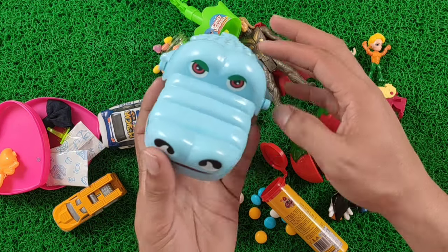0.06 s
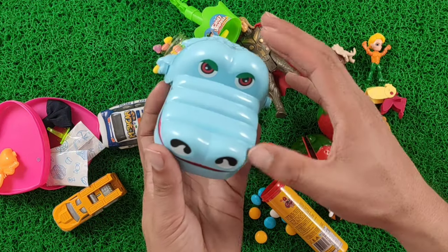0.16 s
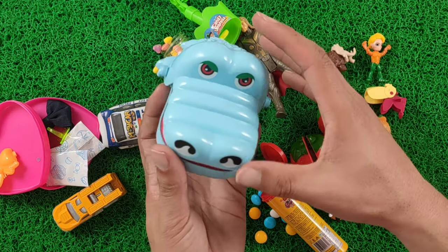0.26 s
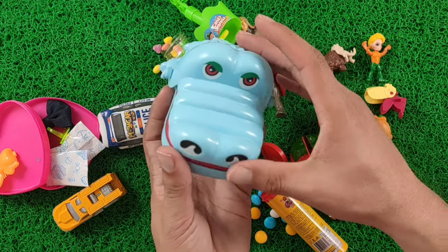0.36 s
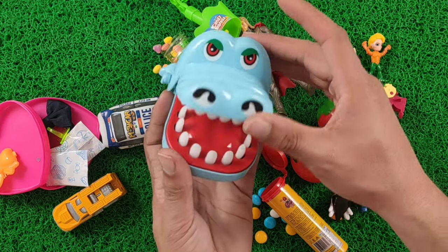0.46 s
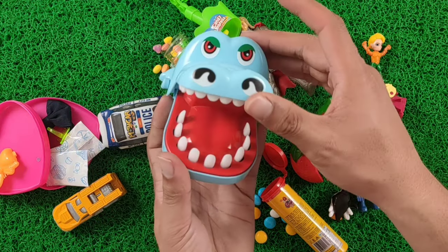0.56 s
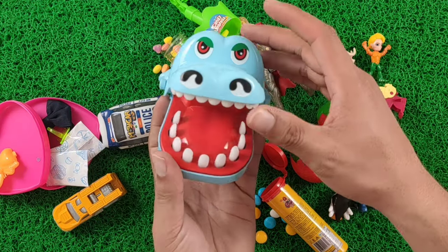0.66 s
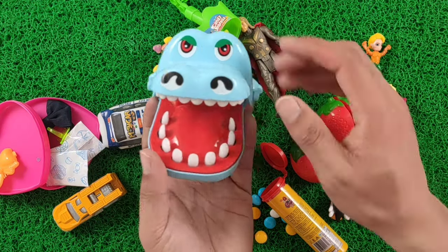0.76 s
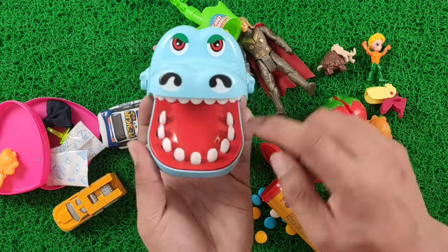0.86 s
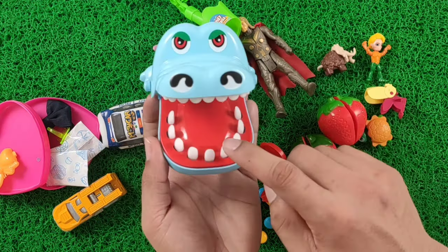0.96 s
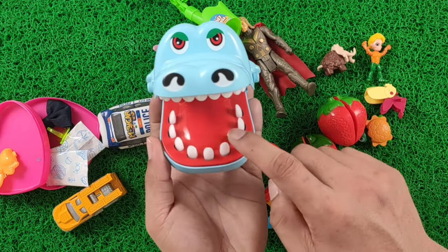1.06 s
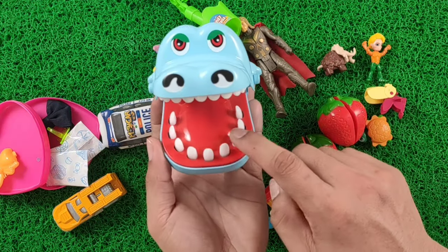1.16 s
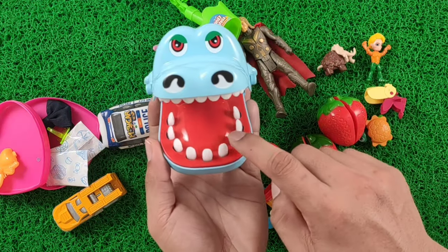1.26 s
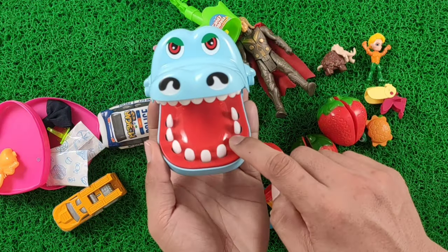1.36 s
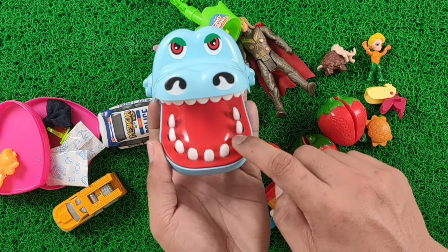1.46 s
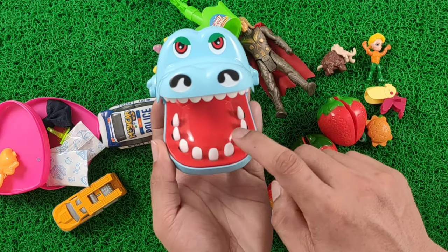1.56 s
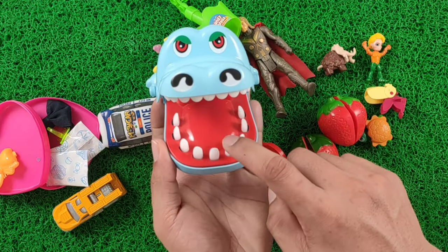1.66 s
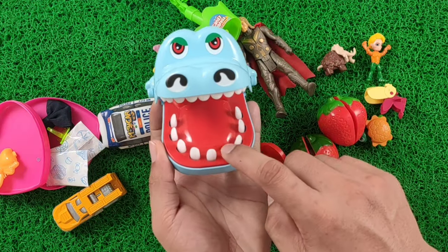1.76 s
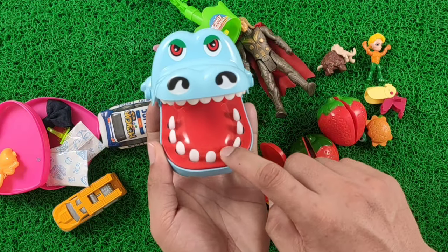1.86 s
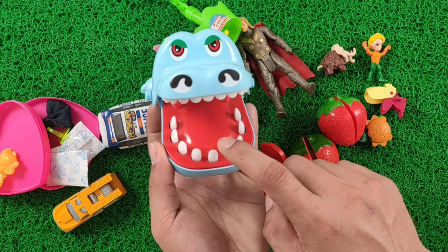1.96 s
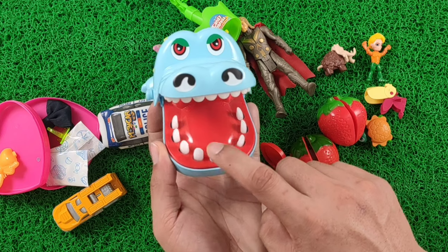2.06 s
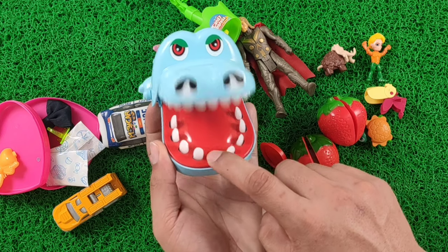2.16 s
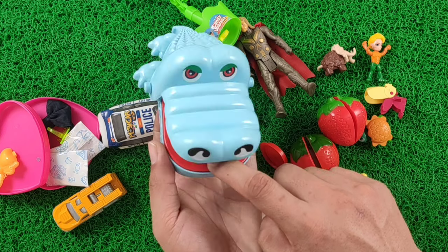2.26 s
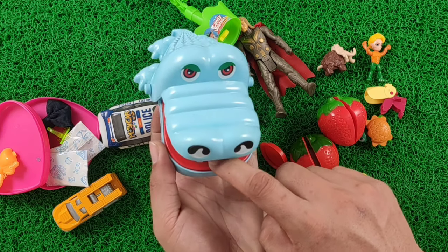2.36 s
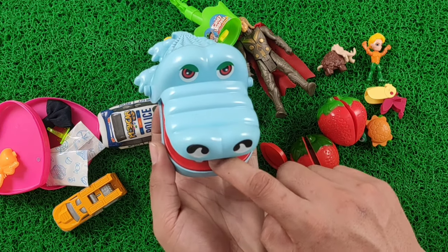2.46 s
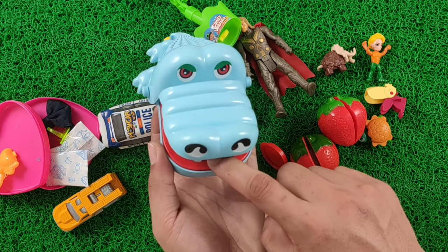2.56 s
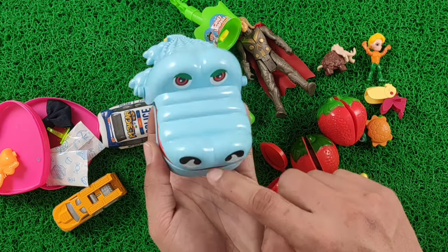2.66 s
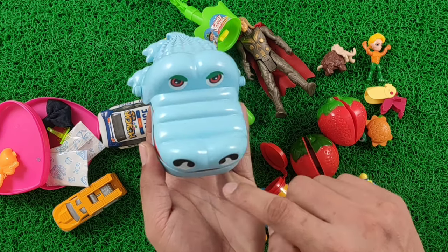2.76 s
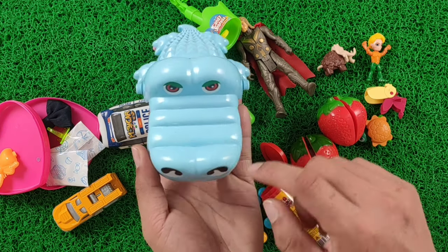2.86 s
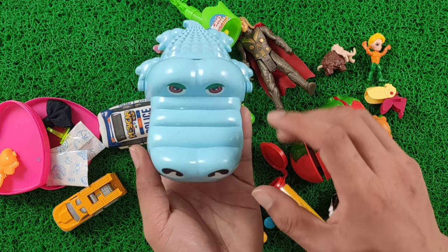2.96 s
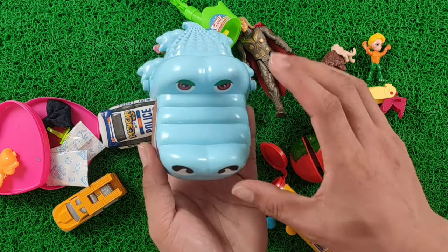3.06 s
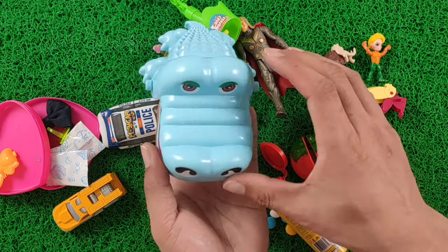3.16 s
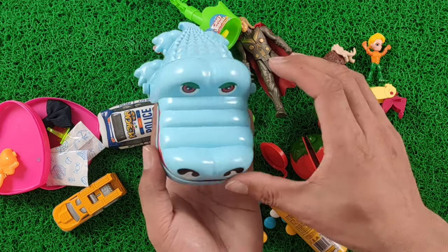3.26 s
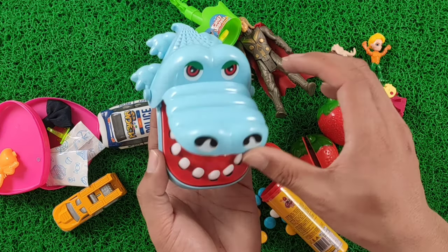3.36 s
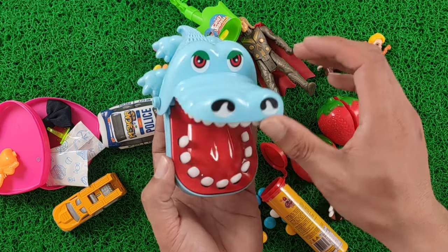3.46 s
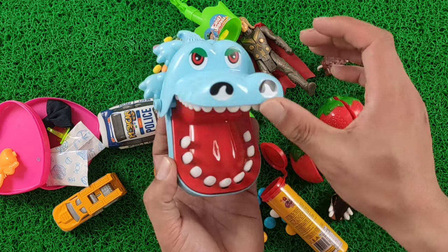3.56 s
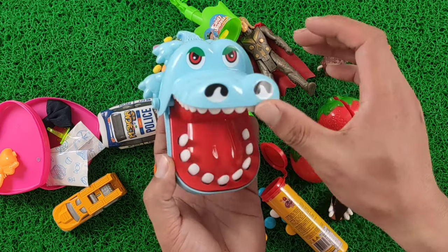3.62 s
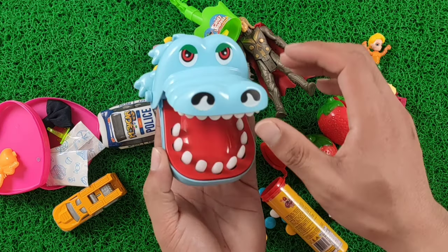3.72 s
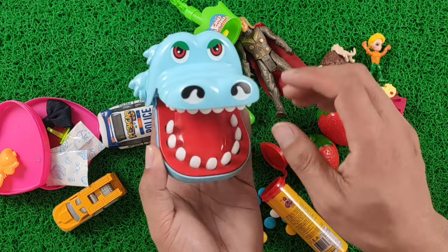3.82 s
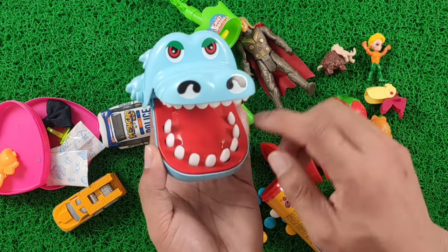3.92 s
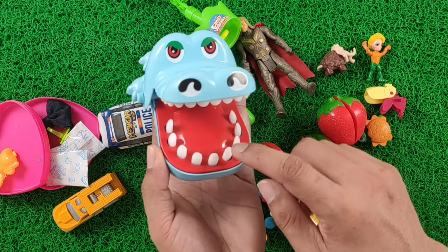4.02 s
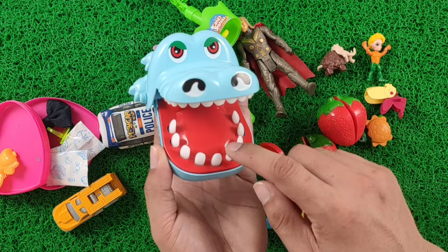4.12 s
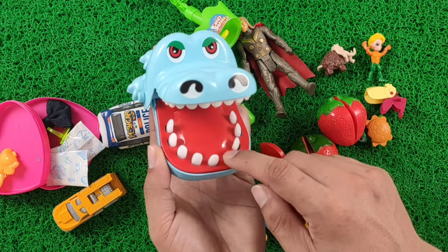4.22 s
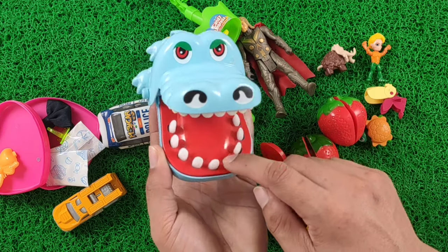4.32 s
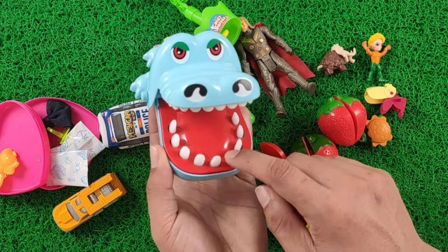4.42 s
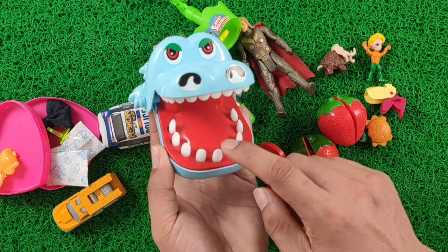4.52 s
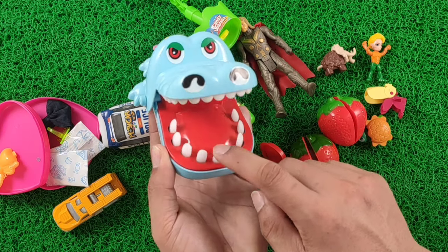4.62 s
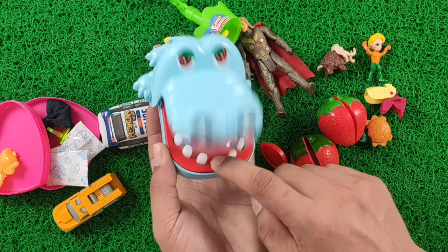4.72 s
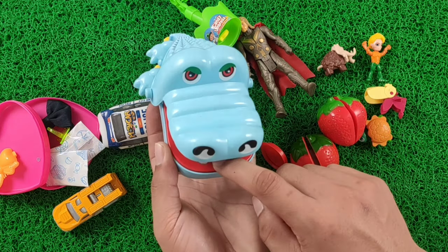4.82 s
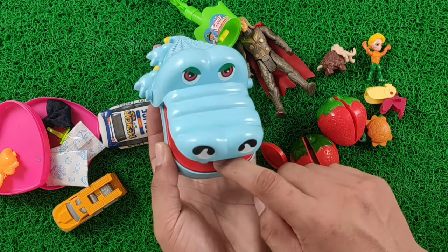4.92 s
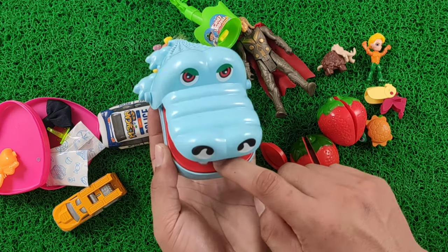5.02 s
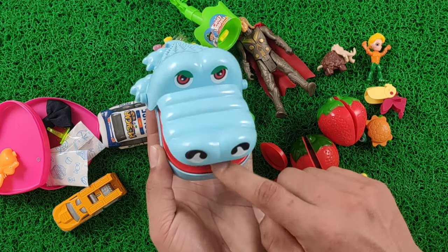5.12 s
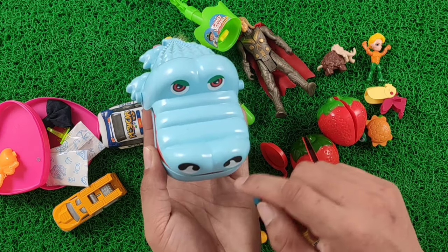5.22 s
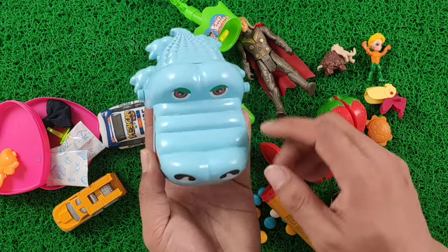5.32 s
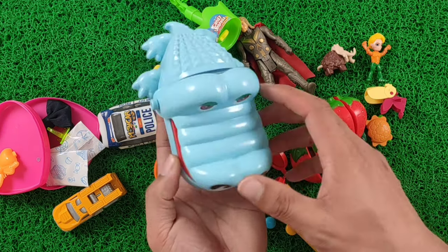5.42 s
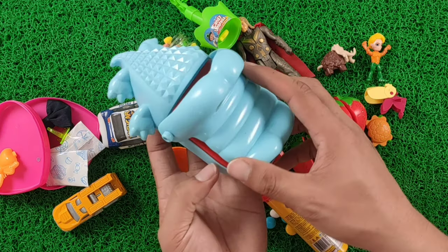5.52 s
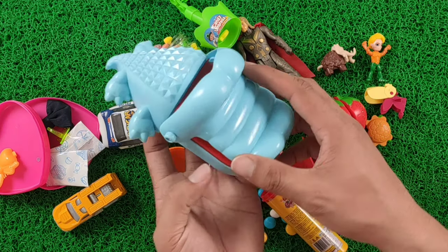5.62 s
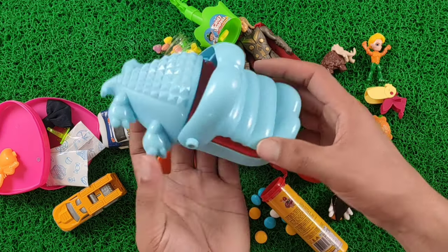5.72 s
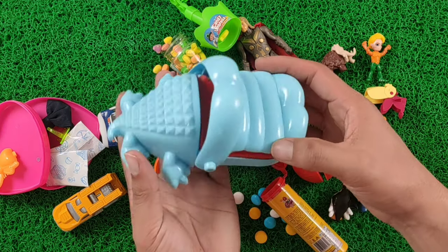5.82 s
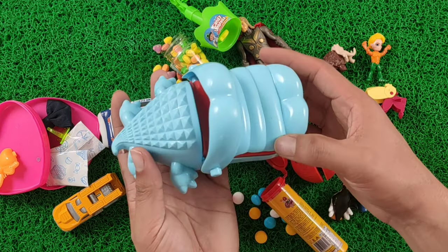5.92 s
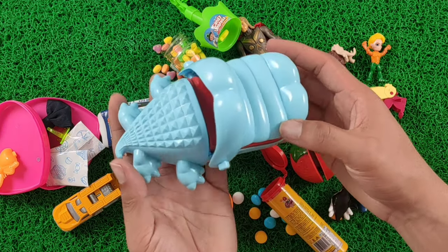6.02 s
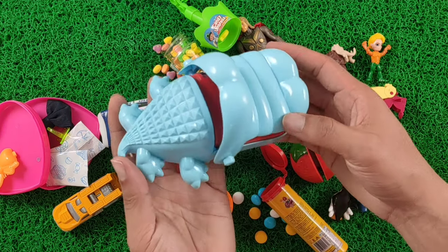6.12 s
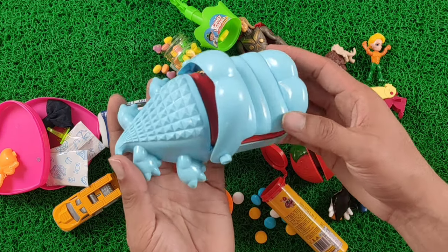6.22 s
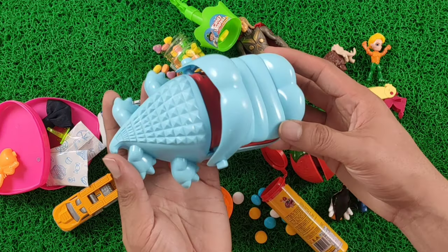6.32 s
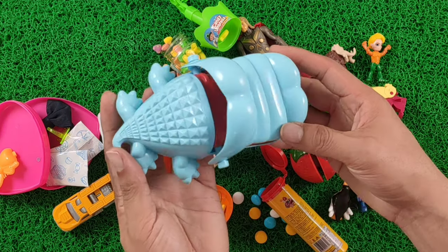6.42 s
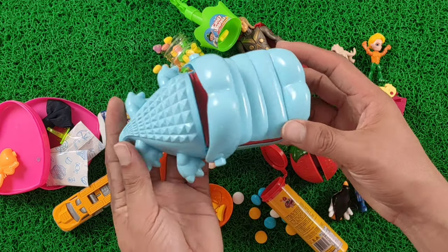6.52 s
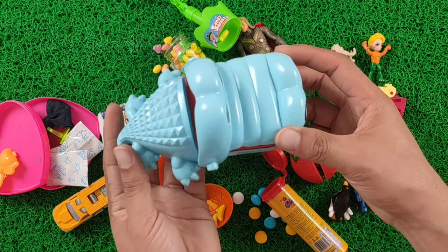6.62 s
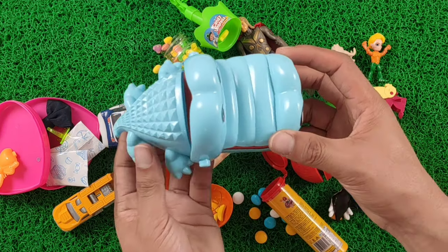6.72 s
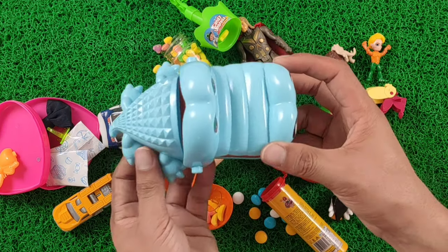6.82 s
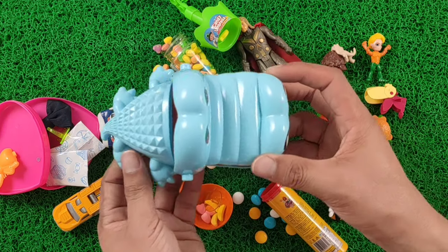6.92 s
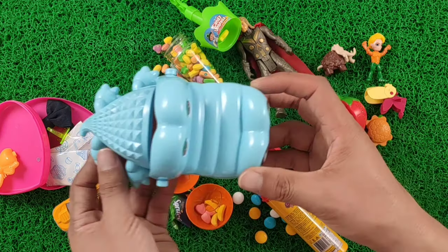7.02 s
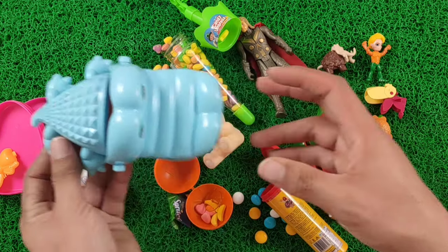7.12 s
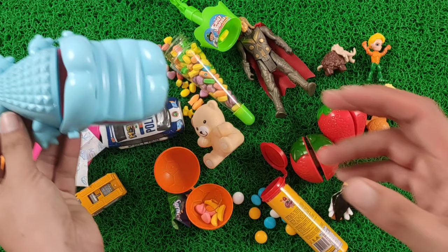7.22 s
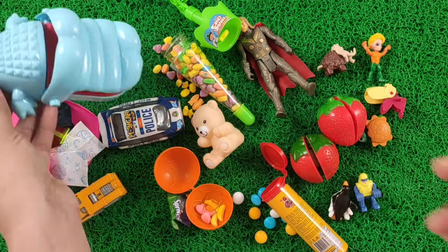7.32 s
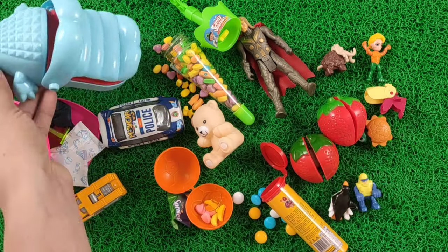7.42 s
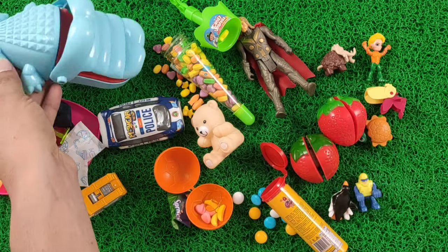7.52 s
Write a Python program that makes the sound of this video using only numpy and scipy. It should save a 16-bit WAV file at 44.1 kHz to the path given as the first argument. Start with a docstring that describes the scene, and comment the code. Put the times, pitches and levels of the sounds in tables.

```python
"""Hollow toy with a snapping jaw

A hollow plastic toy is held close to a phone in a bare room: its hinged jaw is cocked open, teeth click
down under a finger, the jaw snaps shut and is let go, twice over. Every knock rings the mouth hollow and
the shell as decaying sines and cracks in the treble as shaped noise. Grainy noise rustles as fingers rub
the plastic, creaks and dull thuds come from the grip, and a low room rumble fades out at the end.
"""
import sys
import numpy as np
from scipy import signal
from scipy.fft import rfft, irfft, next_fast_len
from scipy.io import wavfile

SR = 44100
rng = np.random.default_rng(int(sys.argv[2]) if len(sys.argv) > 2 else 0)


def to_wav(s):
    """Save 16-bit WAV."""
    ch = np.atleast_2d(s).T  # columns
    pcm = np.round(np.clip(ch, -1, 1) * 32767)  # PCM
    wavfile.write(sys.argv[1], SR, pcm.astype(np.int16))


N = 334137  # samples

EARS_APART = 1  # mix of each microphone's own noise and the noise both share: in crack it scales the own noise, in fingers the shared noise


def undb(db):
    """Decibels to linear gain."""
    return 10 ** (np.asarray(db) / 20)


def unit(x):
    """Scale to an RMS of 1."""
    return x / np.sqrt(np.mean(x ** 2))


def fall(t, t60):
    """Exponential decay that drops 60 dB in t60 seconds."""
    return np.exp(-np.log(1000) * t / t60)


def resonate(x, peaks):
    """Sum of band-passes, each given as Hz, width in Hz and dB."""
    out = 0
    for hz, width, db in peaks:
        out = out + undb(db) * signal.lfilter(*signal.iirpeak(hz, hz / width, fs=SR), x)
    return out


def toy():
    """All knocks; each kind rings freely for its own time and favours its spot of the hollow by its own amount."""
    # The mechanism moves in set runs of contacts. Each row: ms after the first contact,
    # then hollow, shell and crack level in dB, relative to the levels of the move.
    tooth_run = [(0, 0, -3, -1), (4.3, -7, 0, 0), (10, -8, -7, -7), (16, -10, -10, -9), (22, -13, -9, -20)]
    snap_run = [(0, -10, -20, -3), (5.5, -4, -4, -2), (8, 0, 0, 0), (17, -4, -10, -6), (22, -1, -3, -8),
                (26, -2, -8, -4), (35, -9, -20, -8)]
    release_run = [(0, -2, -11, -6), (3, -3, -7, -4), (9.5, -1, -1, -7), (14, -8, 0, -1), (18.5, 0, -4, 1),
                   (25, -8, -11, -9), (36, -7, -12, -11)]
    catch_run = [(0, -3, -2, 0), (3, 0, -5, -6), (18, -16, -8, -8)]
    latch_run = [(0, -8, -20, -7), (7, -1, -1, 0), (12.5, -10, -4, -4), (21, -14, -16, -12)]
    single = [(0, 0, 0, 0)]

    # Moves of the mechanism. Each row: start in seconds, time stretch of the run, extra fade of the run in
    # dB per unstretched ms, how far the jaw is shut (0-1), favoured hollow pitch in Hz, its peak in dB,
    # favoured shell pitch in Hz, its peak in dB, crack peak in dB, chatter time in ms.
    teeth = [(1.5498, 1.01, -.02, .2, 1020, -24.5, 1930, -22.5, -15.5, 2.1),
             (1.9982, .98, .02, .2, 970, -20, 1900, -20.5, -27, 4.1),
             (2.414, .99, .2, .05, 850, -21, 1850, -19.5, -28, 5.5),
             (4.468, .85, -.25, .1, 970, -20, 1880, -24.5, -16.5, 5.5),
             (4.921, 1.3, .4, .45, 950, -21, 1840, -22, -25, 7)]
    snaps = [(2.4715, 1.12, -.03, .75, 1000, -17, 1980, -15.5, -12.5, 4),
             (4.9961, .84, .15, .6, 1000, -15, 1880, -11.5, -9, 2.9)]
    releases = [(2.9325, .99, .05, .9, 950, -21, 2000, -16, -20, 3.8),
                (5.383, 1.09, -.02, .9, 1080, -19, 2020, -13, -18, 4.8)]
    catches = [(.6995, .9, .02, .15, 965, -19, 2050, -23, -20.5, 3.5),
               (3.6577, 1.2, .1, .02, 985, -18.5, 1920, -24, -20, 3.2)]
    latches = [(.766, .88, .4, .9, 1000, -23, 1950, -14.5, -14, 2.4),
               (3.722, 1.01, -.15, .3, 970, -22, 2250, -17, -21, 5.5)]

    # Light single knocks while the toy is handled. Each row: start in seconds, how far the jaw is shut (0-1),
    # hollow, shell and crack peak in dB.
    light_knocks = [(.2555, .5, -46, -42, -23), (.279, .5, -35.5, -35, -30), (.412, .9, -44, -42, -46),
                    (.614, .05, -31.5, -39, -43), (.62, 0, -37, -49, -47), (.63, 0, -34.5, -53, -50),
                    (.638, 0, -36.5, -45, -51), (2.123, .1, -40, -39, -53), (3.516, .8, -47, -49, -64),
                    (3.566, 0, -42.5, -53, -62), (3.604, .3, -39, -50, -59), (3.624, .1, -47, -50, -46),
                    (3.648, 0, -37.5, -50, -48), (3.714, 0, -31.5, -34, -25), (3.781, .3, -43, -34.5, -33),
                    (3.925, 0, -42, -44, -48), (3.936, 0, -35.5, -37, -42), (3.947, 0, -30, -49, -41),
                    (5.651, 1, -42, -40, -51), (7.071, .85, -63, -57, -46), (7.14, .9, -73, -70, -40)]
    hollow_hz, shell_hz, chatter_ms = 990, 1920, 2.2
    nudges = [(s, 1, 0, shut, hollow_hz, hollow_db, shell_hz, shell_db, crack_db, chatter_ms)
              for s, shut, hollow_db, shell_db, crack_db in light_knocks]

    knocks = play(teeth, tooth_run, free_ms=8.5, focus_db=8)
    knocks += play(snaps, snap_run, free_ms=8.6, focus_db=8.5)
    knocks += play(releases, release_run, free_ms=12.5, focus_db=9)
    knocks += play(catches, catch_run, free_ms=12.6, focus_db=19)
    knocks += play(latches, latch_run, free_ms=7.5, focus_db=17)
    knocks += play(nudges, single, free_ms=9.5, focus_db=15)
    return knocks


def play(moves, run, free_ms, focus_db):
    """Every contact of a run, for every move, rings hollow and shell and cracks."""
    # Resonances of the mouth hollow and of the shell. Each row: pitch in Hz, T60 in seconds with the jaw open,
    # level in dB with the jaw open, level in dB with the jaw shut.
    hollow_modes = [(530, 0.027, -13, 0.5), (671, 0.056, -4.5, -0.5), (802, 0.052, -4.5, -0.5),
                    (920, 0.062, -2.5, -6.5), (1080, 0.044, -4, -0.5), (1208, 0.055, -8.5, -2.5),
                    (1314, 0.06, -8.5, -3.5)]
    shell_modes = [(1530, 0.03, -7.5, -0.5), (1652, 0.055, -13.5, -8), (1820, 0.061, -2, -3),
                   (1922, 0.033, -3, -9), (2040, 0.054, -8.5, -9), (2200, .05, -15.5, -3.5),
                   (2347, .05, -10.5, -4), (2483, .05, -7, -3), (2685, 0.028, -5, 4.5)]
    level_scatter_db, spot_scatter = .8, .025  # contact to contact: level, and share of the favoured pitch
    shell_focus_db = 8  # the most that a shell mode far from the struck spot is held back

    out = np.zeros((2, N))
    t = np.arange(SR // 8) / SR
    for s, stretch, fade_db, shut, hollow_hz, hollow_db, shell_hz, shell_db, crack_db, chatter_ms in moves:
        for ms, *re_db in run:
            i = int((s + stretch * ms / 1000) * SR)
            level_db = np.add(re_db, [hollow_db, shell_db, crack_db]) - fade_db * ms
            gain = undb(level_db + level_scatter_db * rng.standard_normal(3))
            spot = 1 + spot_scatter * rng.standard_normal(2)

            hollow = ring(hollow_modes, shut, hollow_hz * spot[0], free_ms, focus_db, t)
            shell = ring(shell_modes, shut, shell_hz * spot[1], free_ms, shell_focus_db, t)
            snap = crack(chatter_ms)
            out[:, i:i + len(t)] += gain[0] * hollow + gain[1] * shell
            out[:, i:i + snap.shape[1]] += gain[2] * snap
    return out


def ring(modes, shut, favoured_hz, free_ms, focus_db, t):
    """One contact rings all modes, most those that move at the struck spot, signs and tuning random; peak 1."""
    choke_t60 = .016  # seconds
    hz, t60, open_db, shut_db = np.transpose(modes)
    level_chance, sign_chance, tuning_chance = rng.standard_normal((3, len(hz)))

    off_spot_db = focus_db * np.minimum(8.2 * np.log2(hz / favoured_hz) ** 2, 1)
    db = open_db + shut * (shut_db - open_db) - off_spot_db + 1.5 * level_chance
    hz = hz * (1 + 0.02 * tuning_chance)
    t60 = t60 * (1 - 0.59 * shut)  # finger and shut jaw damp the ring

    partials = fall(t, t60[:, None]) * np.sin(2 * np.pi * hz[:, None] * t)
    y = (undb(db) * np.sign(sign_chance)) @ partials
    y = y * (1 - np.exp(-t / 0.00047))  # the contact takes a moment to build
    # the part settles against its stop and chokes the ring
    y = y * fall(np.maximum(t - free_ms / 1000, 0), choke_t60)
    return y / np.max(np.abs(y))


def crack(ms):
    """Loose parts chatter for a few ms: many tiny contacts that add up to a smooth colour; peak 1."""
    # Treble colour of the plastic. Each row: centre in Hz, width in Hz, level in dB.
    crack_colour = [(3095, 230, 3), (3900, 830, 0.5), (5150, 480, -3.5), (6210, 1100, -1.5),
                    (7950, 1000, -1), (9500, 2200, -5), (12300, 7600, -24.5)]
    size = 2048  # samples
    t = np.arange(size) / (ms * SR / 1000)
    burst = np.sqrt(t) * np.exp(-t)

    # treble leaves the shell unevenly toward the two microphones
    both, own = rng.standard_normal(size), rng.standard_normal((2, size))
    spectrum = rfft((both + EARS_APART * own) * burst)
    even = irfft(spectrum / np.abs(spectrum)) * burst ** 0.7  # flatten the spectrum, keep the burst short

    hz = np.fft.rfftfreq(size, 1 / SR)
    power = sum(undb(2 * db) / (1 + (2 * (hz - f) / width) ** 2) for f, width, db in crack_colour)
    bass_cut = hz ** 2 / (hz ** 2 + 2500 ** 2)
    y = irfft(rfft(even) * np.sqrt(power) * bass_cut)
    return y / np.max(np.abs(y))


def fingers():
    """Skin slips in tiny grains that hiss and, under a firmer grip, stir the hollow."""
    # Colour of the rustle and of the gripped hollow. Each row: centre in Hz, width in Hz, level in dB.
    rustle_colour = [(3500, 2000, -10.5), (5750, 1800, -5.5), (8100, 4000, 3.5), (12600, 4000, -14.5)]
    grip_colour = [(1000, 160, 5.5), (1400, 490, -4), (1900, 970, -1.5), (2540, 690, -8.5)]
    # Fingers and hinge sliding on the plastic. Each row: peak time in seconds, seconds to rise 20 dB,
    # seconds to fall 20 dB, hiss level in dB, grip level in dB.
    rubs = [(.25, .25, .04, -53, -58), (.3, .03, .55, -62.5, -68), (.616, .005, .2, -60, -54),
            (.69, .1, .01, -56, -53), (3.606, .006, .3, -66, -53), (3.652, .05, .01, -60, -49),
            (3.9, .1, .15, -60, -52), (5.73, .05, .2, -59, -61), (5.992, .03, .19, -58, -67),
            (6.144, .06, .15, -61.5, -62), (6.54, .08, .04, -65, -68.5), (6.6, .05, .22, -68, -70),
            (6.766, .035, .05, -66, -66), (6.86, .1, .25, -79, -78), (7.076, .006, .06, -58, -74),
            (7.15, .08, .04, -65, -79), (7.236, .09, .03, -64, -75), (7.25, .3, .9, -79, -84)]

    # random loudness from sample to sample makes the noise grainy
    grains = rng.standard_normal((3, N)) * undb(2.84 * rng.exponential(size=(3, N)))
    own, both = grains[:2], grains[2]
    hiss = unit(resonate(own + EARS_APART * both, rustle_colour))
    body = unit(resonate(both, grip_colour))

    t, slide, grip = np.arange(N) / SR, 0, 0
    for s, rise, drop, hiss_db, grip_db in rubs:
        swell = undb(-20 * np.where(t < s, (s - t) / rise, (t - s) / drop))
        slide = slide + undb(hiss_db) * swell
        grip = grip + undb(grip_db) * swell
    return hiss * slide + body * grip


def thuds():
    """The whole toy jolts in the palm: a few low, damped sines of body and hand under the main knocks."""
    # Each row: start in seconds, peak in dB.
    jolts = [(0.7, -51), (1.996, -48.5), (2.484, -37.5), (2.941, -42.5), (3.66, -43.5), (4.465, -47.5),
             (5.006, -34), (5.389, -34.5)]
    # Resonances of toy and palm. Each row: pitch in Hz, T60 in seconds, level in dB.
    palm_modes = [(222, 0.049, -3), (307.4, 0.045, 1.5), (370, .05, 0)]

    out, t = np.zeros(N), np.arange(SR // 8) / SR
    for s, db in jolts:
        y = 0
        for hz, t60, mode_db in palm_modes:
            detune = rng.normal(1, 0.057)
            y = y + undb(mode_db) * fall(t, t60) * np.sin(2 * np.pi * hz * detune * t)
        y = y * (1 - np.exp(-t / 0.0018))  # soft onset
        i = int(s * SR)
        out[i:i + len(t)] += undb(db) * y / np.max(np.abs(y))
    return out


def creaks():
    """The grip shifts and the plastic creaks: uneven slips, as noise, stir a single resonance."""
    # Each row: start in seconds, length in seconds, pitch in Hz, level in dB.
    grip_shifts = [(0.108, 0.04, 5900, -58), (0.196, 0.045, 1730, -57.5), (.2, 0.022, 4920, -56),
                   (5.97, .05, 1340, -61), (6.02, 0.27, 3830, -70), (6.135, 0.032, 890, -65),
                   (6.14, .07, 1800, -70), (6.221, 0.019, 920, -60), (6.49, 0.06, 920, -66),
                   (6.57, 0.05, 900, -64), (6.63, .08, 1900, -72), (6.76, 0.019, 920, -62)]

    out = np.zeros(N)
    for s, length, hz, db in grip_shifts:
        slips = rng.standard_normal(SR // 2)
        for width in (160, 260):  # Hz
            slips = resonate(slips, [(hz, width, 0)])
        size, i = int(length * SR), int(s * SR)
        out[i:i + size] += undb(db) * unit(slips)[-size:] * np.sqrt(np.hanning(size))
    return out


def room(x):
    """Toy and hand never hold still: every few ms the sound passes on to another pattern of reflections."""
    turn_ms, patterns = 11, 6
    turn = np.arange(N) / (turn_ms * SR / 1000)
    out = 0
    for k in range(patterns):
        away = (turn - k + patterns / 2) % patterns - patterns / 2  # turns from this pattern's own moment
        share = np.cos(np.pi / 2 * np.clip(away, -1, 1))  # equal-power crossfade
        out = out + signal.fftconvolve((x * share)[None], reflections(), axes=1)[:, :N]
    return out


def reflections():
    """Dense reflections, as decaying noise bands that set in after a few ms with a T60 for each band."""
    # Each row: band centre in Hz, T60 in seconds, level in dB.
    room_bands = [(250, 0.32, -43.5), (500, 0.92, -36.5), (1000, 0.94, -39.5), (2000, 0.85, -40.5),
                  (3920, 0.73, -36.5), (8000, 0.59, -40.5), (13200, 0.48, -37)]
    size = next_fast_len(SR)
    t = np.arange(size) / SR
    hz, noise = diffuse(size)
    centres = np.log(np.array(room_bands)[:, 0])
    tail = 0
    for k, (_, t60, db) in enumerate(room_bands):
        share = np.interp(np.log(hz + 1), centres, np.arange(len(room_bands)) == k)
        tail = tail + undb(db) * irfft(noise * share, size) * fall(t, t60)
    return tail * np.clip((t - .003) / 0.0026, 0, 1)


def diffuse(size):
    """Two noises, alike in the bass and unrelated in the treble, as spectra."""
    alike_hz = 500  # well below this both microphones hear nearly the same diffuse sound
    mid, side = rfft(rng.standard_normal((2, size)))
    hz = np.fft.rfftfreq(size, 1 / SR)
    alike = .97 / (1 + (hz / alike_hz) ** 2)
    mid, side = mid * np.sqrt(1 + alike), side * np.sqrt(1 - alike)
    return hz, np.array([mid + side, mid - side])


def room_tone():
    """Rumble of the house over a faint hiss: diffuse noise with a set spectrum and a slow level curve."""
    # Spectrum of the rumble and hiss. Each row: frequency in Hz, relative density in dB per Hz.
    tone_colour = [(19, -33), (32, -3.5), (70, -3.5), (114, -2.5), (200, -11), (300, -16.5), (784, -22),
                   (870, -22), (990, -25), (1430, -28), (2400, -33), (3030, -36), (8350, -39.5),
                   (14800, -40.5), (16000, -49.5)]
    # Each row: time in seconds, RMS level in dB.
    tone_level = [(0.0, -53.5), (1.1, -51), (3.1, -50.5), (5.6, -51.7), (6.4, -55.5), (6.8, -59),
                  (7.58, -68)]

    size = next_fast_len(N)
    hz, noise = diffuse(size)
    f, db = np.transpose(tone_colour)
    tone = irfft(noise * undb(np.interp(np.log(hz + 1), np.log(f), db)), size)[:, :N]
    s, level_db = np.transpose(tone_level)
    return unit(tone) * undb(np.interp(np.arange(N) / SR, s, level_db))


def scene():
    """Toy, fingers and grip up close, their reflections, and the room tone."""
    left_lag = 3  # samples: the toy is a little nearer the right microphone
    near = toy() + fingers()
    # a small shell radiates little bass
    near = signal.sosfilt(signal.butter(2, 450, "high", fs=SR, output="sos"), near)
    near = near + thuds()
    close = near + creaks()  # creaks are too faint to wake the room
    direct = np.array([np.roll(close[0], left_lag), close[1]])
    return direct + room(near[1]) + room_tone()


def record(dry):
    """The phone cuts the top: a gentle low-pass, then a steep one."""
    soft = signal.sosfilt(signal.butter(4, 14500, fs=SR, output="sos"), dry)
    return signal.sosfilt(signal.ellip(8, .2, 70, 16000, fs=SR, output="sos"), soft)


dry = scene()
out = record(dry)
to_wav(out)
```